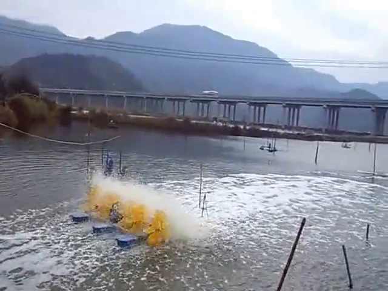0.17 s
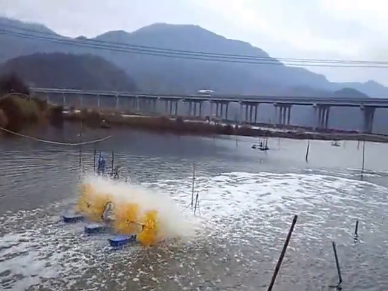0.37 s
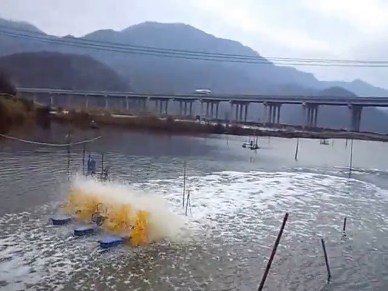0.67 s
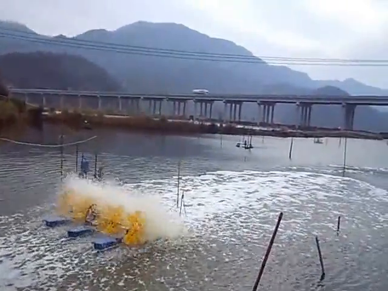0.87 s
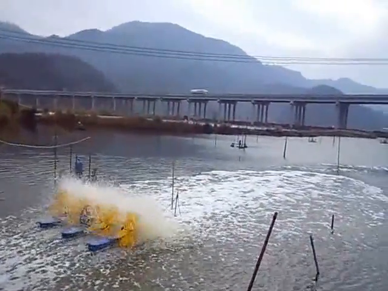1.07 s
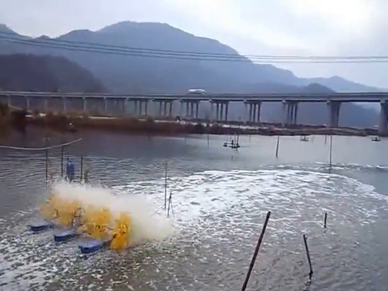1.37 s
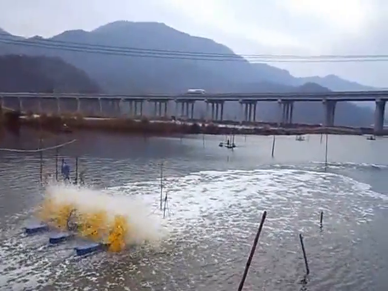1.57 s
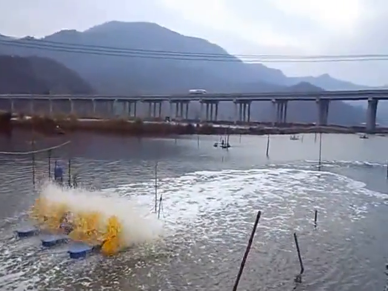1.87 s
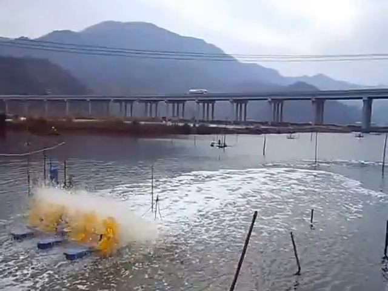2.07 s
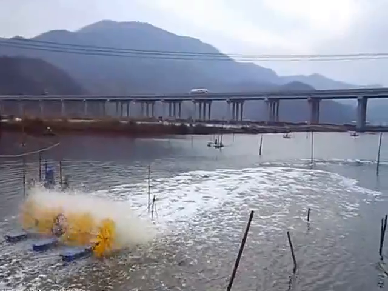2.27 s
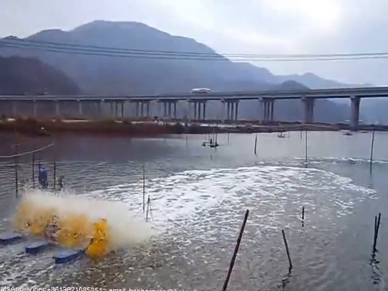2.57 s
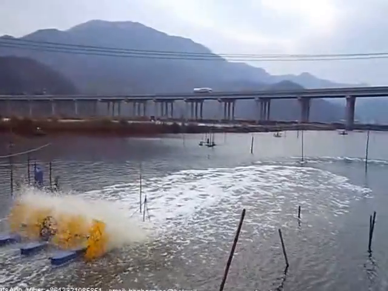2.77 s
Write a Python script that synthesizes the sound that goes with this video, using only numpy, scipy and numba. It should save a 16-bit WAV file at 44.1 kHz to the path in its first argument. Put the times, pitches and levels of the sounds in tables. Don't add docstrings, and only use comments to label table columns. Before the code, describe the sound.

A paddle wheel aerator churns pond water some way off, with rushing spray and a low motor drone, while gusty wind thumps and rumbles loudly on the microphone, mostly on the right side.

```python
import sys
import numpy as np
from scipy import signal
from scipy.fft import rfft, irfft
from scipy.io import wavfile
from scipy.ndimage import uniform_filter1d
from numba import njit

SR = 44100
rng = np.random.default_rng(int(sys.argv[2]) if len(sys.argv) > 2 else 0)


def output_pcm(signal):
    pcm = np.clip(np.atleast_2d(signal).T, -1, 1) * 32767
    wavfile.write(sys.argv[1], SR, np.round(pcm).astype(np.int16))


def boost(x):
    u = np.asarray(x, float) / 20
    return 10 ** u


N = 129213


def in_time(rows):
    s, *columns = np.transpose(rows)
    return [np.interp(np.arange(N) / SR, s, c) for c in columns]


def at_hz(points, hz):
    table_hz, table_db = np.transpose(points)
    return np.interp(np.log(hz + 1e-9), np.log(table_hz), table_db)


def rms_one(x):
    return x / np.sqrt(np.mean(x ** 2) + 1e-20)


def colour(x, points):
    return irfft(rfft(x) * boost(at_hz(points, np.fft.rfftfreq(N, 1 / SR))), N)


def band(x, low_hz, high_hz):
    return signal.sosfilt(signal.butter(2, [low_hz, high_hz], "band", fs=SR, output="sos"), x)


def drift(rate_hz):
    every = 40
    r = np.exp(-2 * every * np.pi * rate_hz / SR)
    slow = signal.lfilter([1], [1, -2 * r, r * r], rng.standard_normal(N // every + 2002))[2000:]
    return np.interp(np.arange(N) / every, np.arange(len(slow)), rms_one(slow))


def ring(x, hz, width_hz):
    r, w = np.exp(-np.pi * width_hz / SR), 2 * np.pi * hz / SR
    return signal.lfilter([0, np.sin(w)], [1, -2 * r * np.cos(w), r * r], x + 1e-18)


def bump(t, s, length_s):
    u = (t - s) / length_s
    return u * np.exp(-u ** 2 / 2)


@njit
def cavity(x, hz, r, rate):
    y = np.zeros(len(x))
    for i in range(2, len(x)):
        push = (1 - r * r) / 2 * (x[i] - x[i - 2])
        y[i] = push + 2 * r * np.cos(2 * np.pi * hz[i] / rate) * y[i - 1] - r * r * y[i - 2]
    return y


def port_hiss():
    return boost(-54) * band(rng.standard_normal((2, N)), 6200, 14000)


def drone():
    # [f/Hz, width/Hz, level over the swell/dB, right minus left/dB]
    tones = [(123.5, 5.3, 16, 8), (246.7, 3.4, 5.5, 9), (352, 6.2, -0.5, 7.5), (368.4, 6.8, 2.5, 8),
             (497.5, 2.3, -8.5, 14), (608.3, 32, -3, 10.5), (729, 8.7, -14, 5), (830, 17, -26, -7)]
    # [t/s, third order/dB, lowest line/dB, gear lines/dB, second order/dB]
    carry = [(0, 5, 0, 2.5, 0.5), (.5, -2, -2, 1, 8), (1.0, 1, -3, -3, -2), (1.12, -2.5, -5.5, 11.5, 0.5),
             (1.3, -1.5, -6, 4, 8.5), (1.42, 2.5, -1.5, -7, -2.5), (1.55, 0.5, 4.5, -5, -1.5),
             (1.68, 5, -4, -0.5, -7.5), (1.78, -8, -10.5, 3.5, 6), (1.9, 0.5, -16, 4.5, -4),
             (2.05, 1.5, -11, 7, -1.5), (2.2, -5.5, -7, -7, -5.5), (2.35, 0, -5, 0, 2),
             (2.5, 4, -7, -2.5, -6), (2.62, 6.5, -4, -1.5, 10), (2.74, -1, 6, -4, -15),
             (2.84, 2, 5.5, -1, -13), (2.93, 0, 9.5, -4, -5)]
    out, t = np.zeros((2, N)), np.arange(N) / SR
    third_db, lowest_db, gear_db, second_db = in_time(carry)
    motor_db = [lowest_db, second_db, third_db, third_db]
    for k, (hz, width_hz, db, pan_db) in enumerate(tones):
        is_motor = k < 4
        steady = 0.91 if is_motor else 0.91 / 4
        carry_db = motor_db[k] if is_motor else gear_db
        phase = 2 * np.pi * (hz * t + rng.random())
        line = (steady + 0.88 * drift(width_hz / 2)) * np.sin(phase)
        line = line + 0.7 * drift(width_hz / 2) * np.cos(phase)
        fades_db = 3 * drift(20)
        sides = boost(np.array([[-pan_db / 2], [pan_db / 2]]))
        out += boost(db + carry_db + fades_db - 1.0) * line * sides
    return out


def plops():
    # [t/s, peak level/dB, f/Hz, puff level/dB]
    drops = [
        (1.105, -44.5, 1290, -77),
        (1.175, -45.5, 1350, -89),
        (1.295, -52, 1780, -75),
        (1.582, -56, 5000, -32.5),
        (1.76, -39, 1790, -70),
        (1.955, -37, 8200, -60),
        (2.893, -39, 1280, -76),
    ]
    t, out = np.arange(N) / SR, np.zeros(N)
    puff = rms_one(band(rng.standard_normal(N), 2800, 9900))
    for s, db, hz, puff_db in drops:
        u = np.maximum(t - s, 0) / (0.00041 + 3 / hz)
        tone = np.sin(2 * np.pi * hz * (t - s) * (1 + 0.0069 * u))
        out += u * np.exp(1 - u) * (boost(db) * tone + boost(puff_db) * puff)
    return out


def bubbles(slaps):
    per_s = 900
    sizes = boost(4.2 * np.minimum(rng.exponential(1, N), 5)) * rng.choice([-1, 1], N)
    born = rng.random(N) < per_s * boost(4 * slaps) / SR
    pitches, dealt = np.geomspace(500, 6000, 24), rng.integers(0, 24, N)
    out = np.zeros(N)
    for k, hz in enumerate(pitches):
        out += np.sqrt(hz) * ring(sizes * born * (dealt == k), hz, hz * 0.05)
    return rms_one(out)


def spray(slaps):
    # [f/Hz, share]
    likeness = [(300, 0.7), (2500, 0.83), (4000, 0.98), (6000, 0.043), (9000, 0.61), (13000, 0.25)]
    patchy_db, slap_db = 0.7, 0.5
    out, together = 0, drift(3)
    half_octaves = 100 * 2 ** np.arange(0, 7.6, .5)
    white = rng.standard_normal((2, 2, N))
    for k, (low, high) in enumerate(zip(half_octaves, half_octaves[1:])):
        mid, side = band(white[k % 2], low, high)
        hz = np.sqrt(low * high)
        alike = np.clip(at_hz(likeness, hz), 0, 1)
        patches_db = patchy_db * (0.14 * together + drift(18))
        throb_db = slap_db * slaps * (1000 / max(hz, 1000)) ** 0.21
        both = np.sqrt(1 + alike) * mid + np.sqrt(1 - alike) * side * [[1], [-1]]
        out = out + boost(patches_db + throb_db) * both
    return out


def churned_water():
    # [f/Hz, level/dB]
    water_colour = [(150, 12), (330, 11.5), (450, 9.5), (650, 11), (1000, 3.5), (1400, 4.5), (2500, 1),
                    (5000, 1)]
    paddles_per_s = 13 + 1.5 * drift(1.6)
    slaps = np.cos(2 * np.pi * np.cumsum(paddles_per_s) / SR)
    water = rms_one(spray(slaps)) + boost(-6) * bubbles(slaps) * 0.5
    mirror_s, mirror_hz, mirror_share = 0.001748, 2570, -.28
    dull = signal.sosfilt(signal.butter(1, mirror_hz, fs=SR, output="sos"), water)
    water = water + mirror_share * np.roll(dull, int(mirror_s * SR), axis=1)
    return colour(water, water_colour)


def through_ports(sound, ring_hz):
    # [f/Hz, level/dB]
    left_treble = [(5000, -1.5), (6000, -7.5), (9000, -7), (14000, -6.5)]
    # [f/Hz, level/dB]
    right_colour = [(300, 2.5), (1000, 4.5), (2500, 0.5), (4000, -2), (6000, -4), (10000, -8), (12000, -15),
                    (14000, -17)]
    ring_width_hz, ring_db = 1950, 11.5
    left, right = sound
    right = right + boost(ring_db) * cavity(right, ring_hz, np.exp(-np.pi * ring_width_hz / SR), SR)
    return np.array([colour(left, left_treble), colour(right, right_colour)])


def wind_flow(t):
    # [t/s, level/dB, small eddies over large/dB]
    gusts = [(0.0, -22, 1), (0.09, -21, 1), (0.12, -19, -2), (0.45, -25, 1.5), (0.6, -22.5, 2),
             (0.9, -22.5, 0), (0.95, -25, -1), (1.18, -25, 2), (1.38, -28, -3.5), (1.44, -24, -1.5),
             (1.49, -29, 5), (1.56, -24, 3), (1.72, -21.5, -1), (1.88, -20.5, 0.5), (2.3, -21, -1.5),
             (2.57, -24.5, 1.5), (2.64, -27, -4), (2.72, -22.5, 1)]
    # [f/Hz, level per Hz/dB]
    wind_colour = [(12, -10), (30, -4), (60, -6), (110, -10.5), (200, -17), (400, -30.5), (800, -62),
                   (2000, -70)]
    gust_db, small_db = in_time(gusts)
    onset_s = 0.013
    fade_in = np.clip(0.033 + t / onset_s, 0, 1)
    fade_out = np.clip(.3 + (t[-1] - t) / onset_s, 0, 1)
    air = rms_one(colour(rng.standard_normal((2, N)), wind_colour)) * fade_in * fade_out
    deep = signal.sosfilt(signal.butter(2, 110, fs=SR, output="sos"), air)
    lumps_db = 2.2 * (0.79 * drift(26) + 0.86 * drift(8))
    brighter_db = small_db + 0.3 * (gust_db - gust_db.mean())
    small = boost(-2.5) * (air - deep) * boost(lumps_db + brighter_db)
    return boost(gust_db + 3.5) * (deep * boost(0.61 * lumps_db) + small)


def torn_air():
    low_hz, high_hz = 180, 690
    flutter = band(rng.standard_normal(N), low_hz, high_hz)
    flutter = rms_one(band(flutter, 84, high_hz * 0.76))
    return flutter / np.sqrt(uniform_filter1d(flutter ** 2, size=600) + .1)


def wind():
    # [t/s, peak level/dB, length/s]
    eddies = [(0.01, -7, 0.0031), (0.035, -6, 0.0073), (0.076, -2.5, 0.0072), (0.09, -13, 0.01),
              (0.314, -10, 0.0057), (0.378, -13, 0.0047), (0.479, -13.7, 0.0022), (0.556, -18, 0.0089),
              (0.609, -2, 0.0027), (0.68, -5.5, 0.0049), (0.696, -4.5, 0.0035), (0.734, -8.5, 0.0025),
              (0.761, -5, 0.008), (0.794, -1.5, 0.0043), (0.805, -15, 0.012), (0.823, -10.5, 0.0042),
              (0.849, -21, 0.0076), (0.903, -7.5, 0.0071), (0.926, -9.5, 0.013), (1.008, -14.3, 0.011),
              (1.096, -12.5, 0.0051), (1.219, -17, 0.0092), (1.429, -11, 0.0049), (1.55, -10.3, 0.0028),
              (1.615, -6, 0.0062), (1.629, -9, 0.0036), (1.651, -8, 0.0024), (1.672, -1.5, 0.0038),
              (1.698, -7, 0.0035), (1.756, -11, 0.016), (1.792, -7.5, 0.0048), (1.809, -6.5, 0.0053),
              (1.854, -14, 0.018), (1.869, -1.2, 0.0035), (1.886, -3, 0.007), (1.911, -11.4, 0.005),
              (1.933, -21, 0.011), (1.957, -3, 0.004), (1.987, -10.5, 0.0029), (2.006, -7.5, 0.002),
              (2.02, -5.5, 0.0036), (2.035, -8.5, 0.0054), (2.083, -7.5, 0.0054), (2.138, -11, 0.0049),
              (2.185, -14.5, 0.013), (2.212, -9, 0.0086), (2.236, -8.5, 0.0048), (2.285, -12, 0.01),
              (2.407, -10, 0.013), (2.468, -17.5, 0.013), (2.53, -11.7, 0.0022), (2.548, -14.5, 0.0023),
              (2.568, -4.5, 0.0028), (2.587, -6, 0.0042), (2.712, -9, 0.0027), (2.727, -7, 0.0017),
              (2.776, -12, 0.0064), (2.851, -11, 0.0053), (2.892, -11.5, 0.012), (2.919, -13.5, 0.014),
              (-.004, -13, .004),
        (2.923, -7, .008),
        (.889, -19, .0012),
        (.902, -15, .0015),
    ]
    # [t/s, peak level/dB, length/s]
    rim_snaps = [(0.007, -9.5, 0.00082), (0.028, -24, 0.0007), (0.043, -17, 0.00067), (0.066, -10, 0.00061),
                 (0.592, -22, 0.0011), (0.603, -15, 0.0007), (0.637, -22.5, 0.00057), (0.66, -20, 0.00076),
                 (0.676, -19, 0.00084), (0.694, -31, 0.001), (0.73, -19.5, 0.0007), (0.759, -18.5, 0.00075),
                 (0.799, -15, 0.0011), (0.896, -15.5, 0.0011), (1.615, -19, 0.00067),
                 (1.632, -22.5, 0.00087), (1.654, -30, 0.00098), (1.668, -23, 0.00078), (1.693, -16, 0.001),
                 (1.783, -32, 0.001), (1.797, -24, 0.0013), (1.836, -24, 0.00076), (1.855, -26, 0.0008),
                 (1.871, -9, 0.00091), (1.889, -22.7, 0.0011), (1.929, -19.5, 0.0011), (1.953, -14, 0.0017),
                 (1.984, -24, 0.001), (2.015, -11.5, 0.00058), (2.037, -19, 0.00084), (2.053, -25, 0.0007),
                 (2.089, -12.5, 0.001), (2.112, -20, 0.0007), (2.208, -20.5, 0.0014),
                 (2.283, -23.5, 0.0011), (2.317, -24, 0.0016), (2.708, -20, 0.0006), (2.742, -23, 0.0014),
                 (2.778, -28, 0.0017), (2.84, -14, 0.0014)]
    # [t/s, peak level/dB, flutter f/Hz]
    left_eddies = [
        (0.155, -33, 120),
        (0.612, -37, 110),
        (0.9, -36, 170),
        (1.776, -31, 231),
        (1.93, -26, 165),
        (1.995, -16, 180),
        (2.003, -24, 300),
        (2.01, -20, 79.4),
        (2.445, -25, 110),
    ]
    t = np.arange(N) / SR
    flow, flutter = wind_flow(t), torn_air()
    right, left = flow[1].copy(), boost(-18) * flow[0]
    for s, db, length_s in eddies:
        right += boost(db + 2.5) * bump(t, s, length_s)
    flutter_s, flutter_db = 0.0063, -14.5
    for s, db, length_s in rim_snaps:
        right += boost(db + 4.0) * bump(t, s, length_s)
        right += boost(db + flutter_db) * flutter * np.exp(-((t - s) / flutter_s) ** 2 / 2)
    for s, db, hz in left_eddies:
        swell_and_fade = np.exp(-((t - s) / (0.002 + 0.41 / hz)) ** 2 / 2)
        left += boost(db) * np.sin(2 * np.pi * hz * (t - s)) * swell_and_fade
    leak_hz, leak_db = 60, -5
    r = np.exp(-2 * np.pi * leak_hz / SR)
    duller = signal.lfilter([(1 - r) ** 2], [1, -2 * r, r * r], right)
    dull = signal.lfilter([1 - r], [1, -r], right)
    return np.array([left + boost(leak_db) * (duller * 0.22 + dull * 0.54), right])


def scene():
    # [t/s, level/dB, ring of the right port f/Hz]
    swell = [(0, -54, 10400), (.16, -59.5, 10600), (.47, -57, 9350), (.66, -53, 8600), (.98, -57.5, 8710),
             (1.15, -55, 9000), (1.33, -52, 9150), (1.4, -48, 9100), (1.58, -45, 8550), (1.68, -45, 8300),
             (1.86, -46.5, 8240), (1.95, -48, 8500), (2.1, -50, 8440), (2.4, -50.5, 8300), (2.6, -49, 8200),
             (2.74, -47, 8100), (2.93, -47.5, 7900)]
    swell_db, ring_hz = in_time(swell)
    water = boost(swell_db + 6.5) * churned_water() + plops() + port_hiss()
    return through_ports(water, ring_hz) + boost(swell_db) * drone() + wind()


def roll_off(x):
    return signal.sosfilt(signal.butter(12, 14140, fs=SR, output="sos"), x)


def record(dry):
    mix = np.tanh(dry * 0.88) / 0.82
    return roll_off(mix)


dry = scene()
out = record(dry)
output_pcm(out)
```